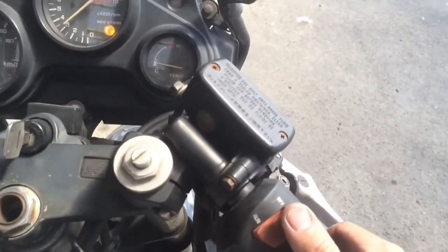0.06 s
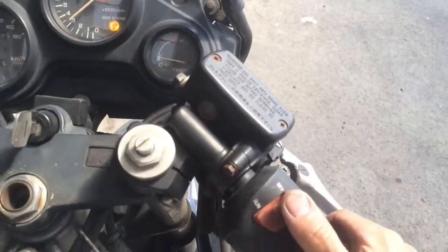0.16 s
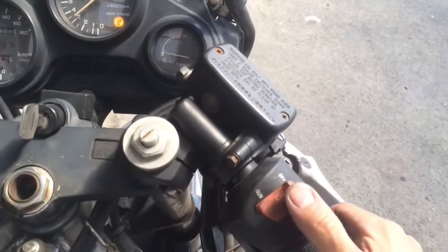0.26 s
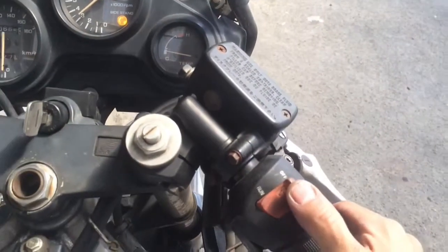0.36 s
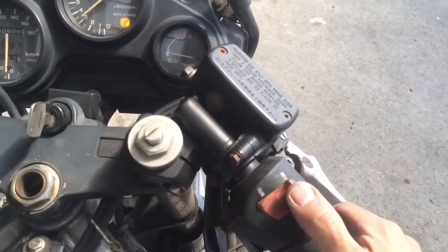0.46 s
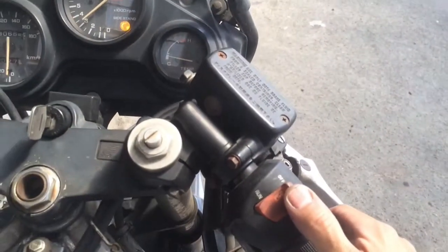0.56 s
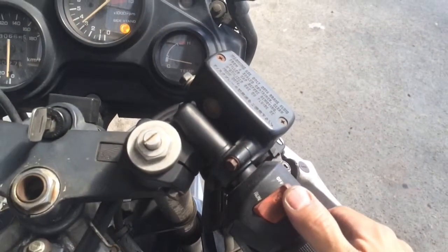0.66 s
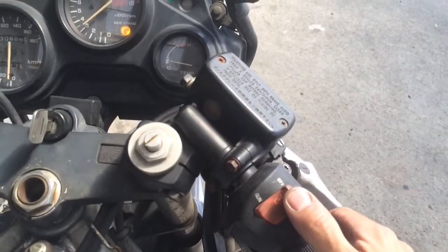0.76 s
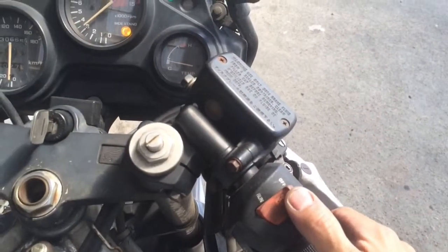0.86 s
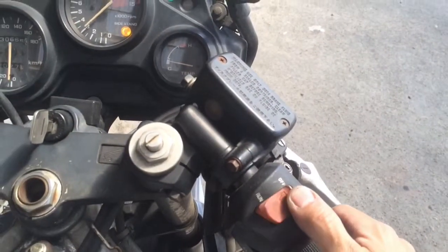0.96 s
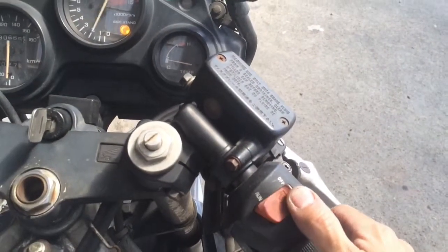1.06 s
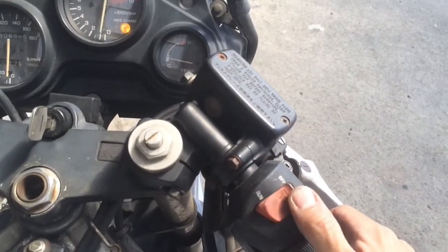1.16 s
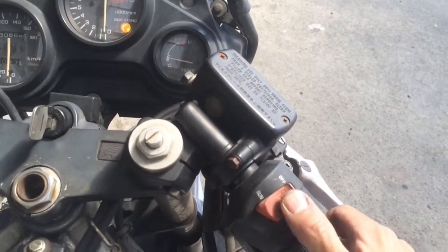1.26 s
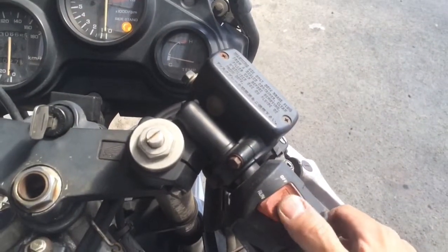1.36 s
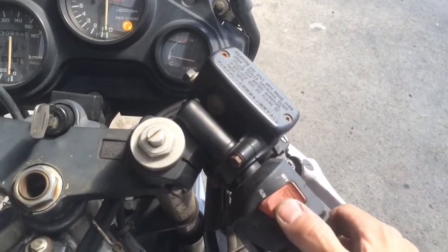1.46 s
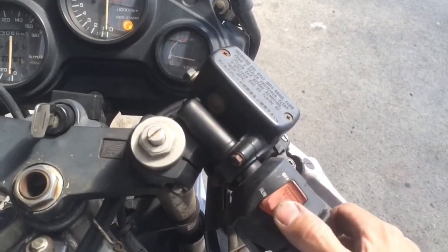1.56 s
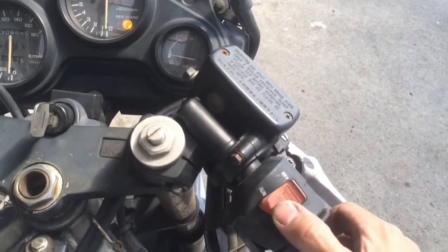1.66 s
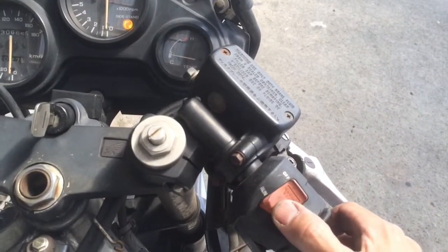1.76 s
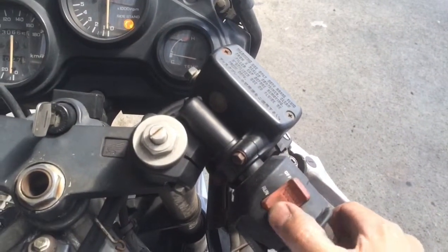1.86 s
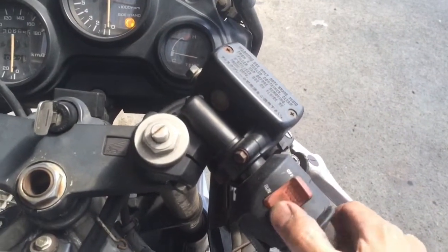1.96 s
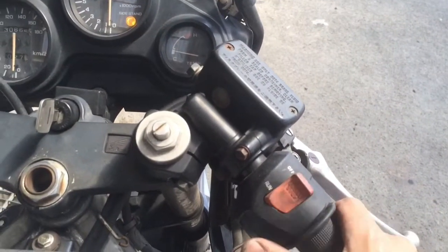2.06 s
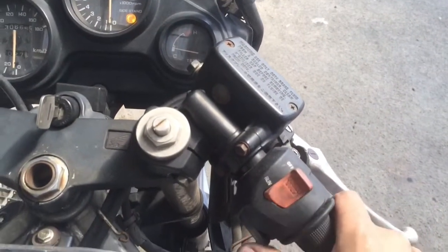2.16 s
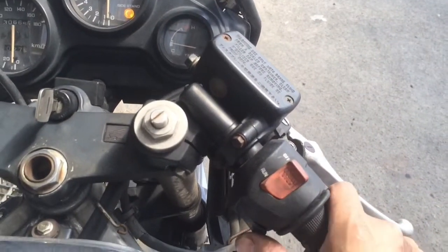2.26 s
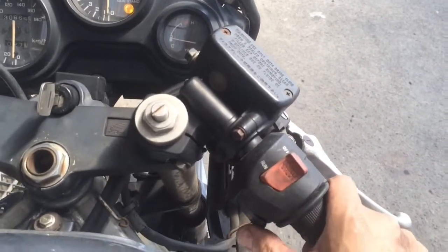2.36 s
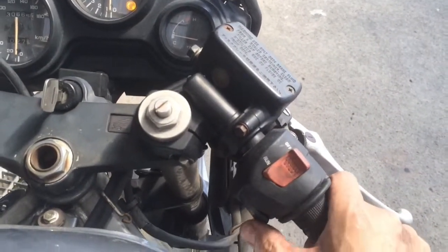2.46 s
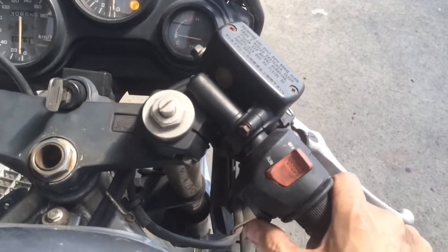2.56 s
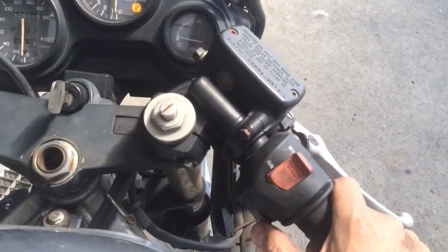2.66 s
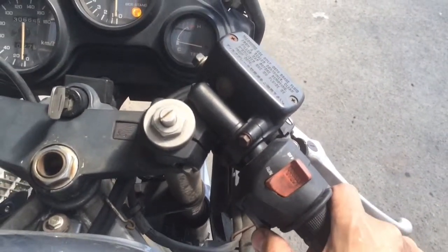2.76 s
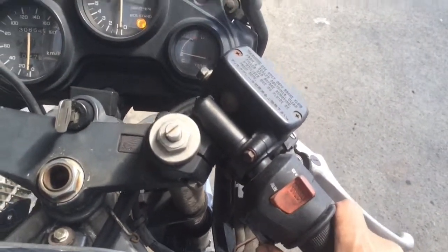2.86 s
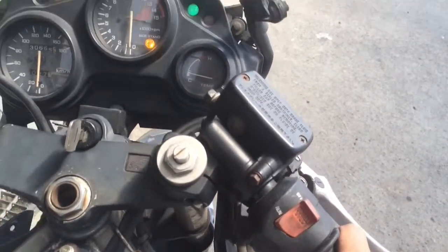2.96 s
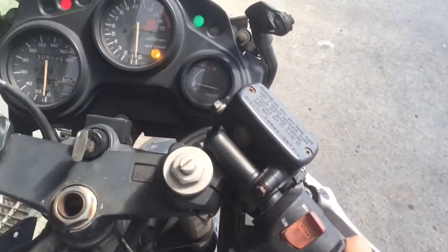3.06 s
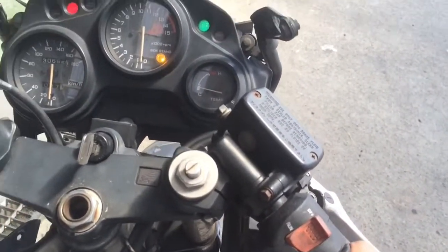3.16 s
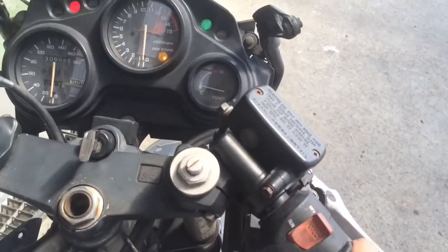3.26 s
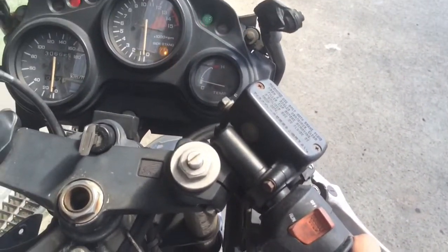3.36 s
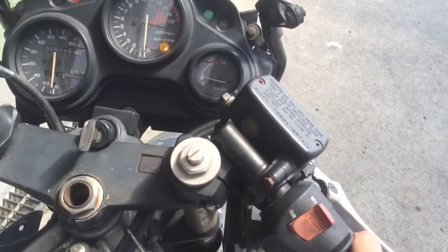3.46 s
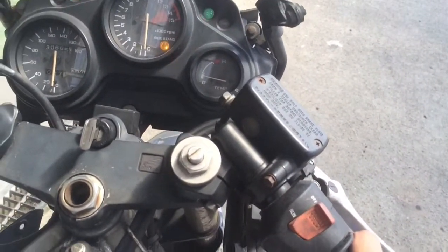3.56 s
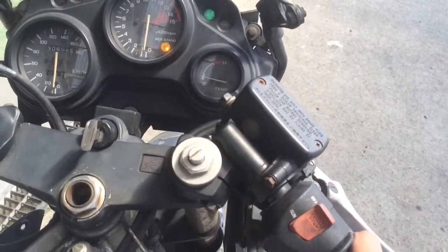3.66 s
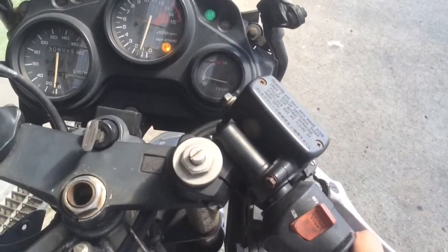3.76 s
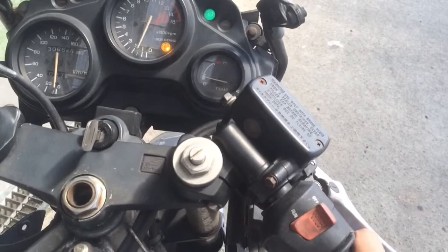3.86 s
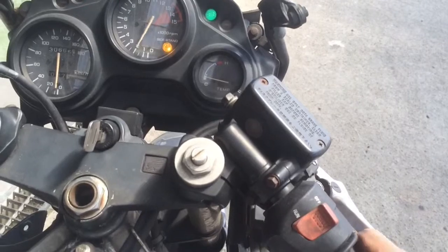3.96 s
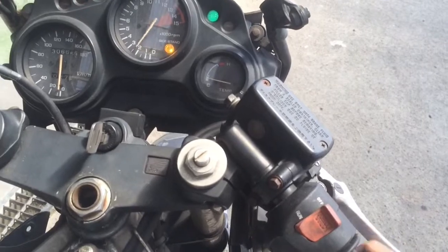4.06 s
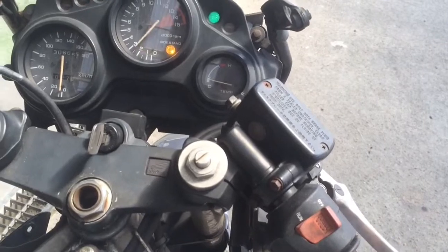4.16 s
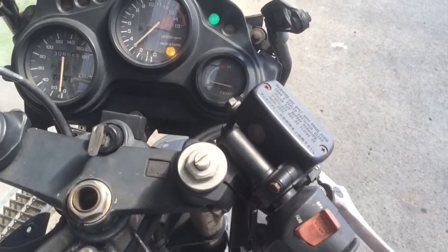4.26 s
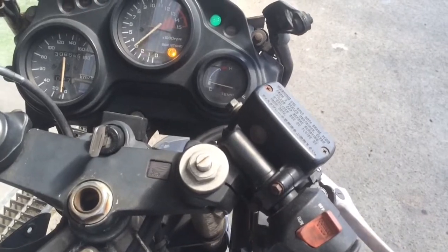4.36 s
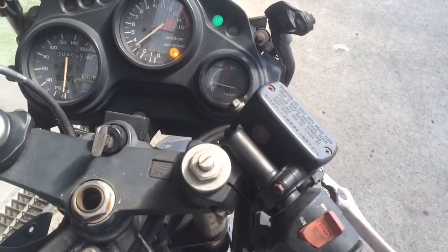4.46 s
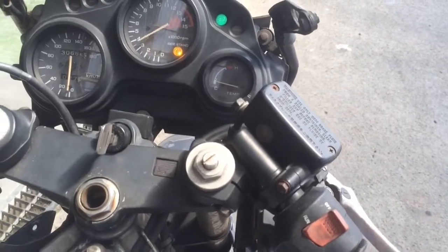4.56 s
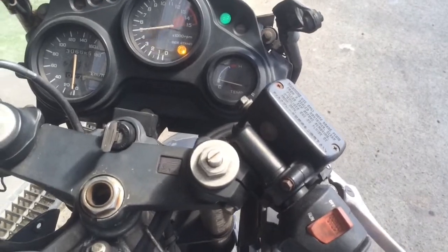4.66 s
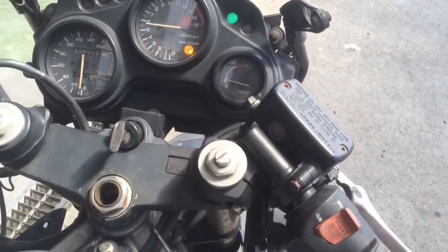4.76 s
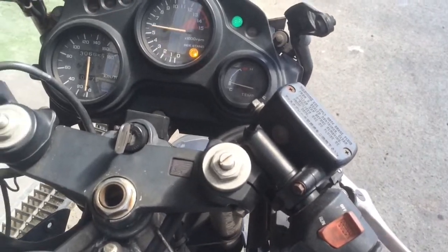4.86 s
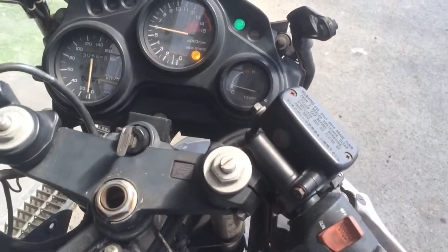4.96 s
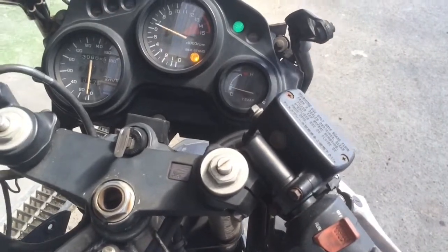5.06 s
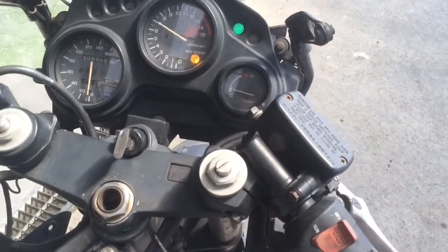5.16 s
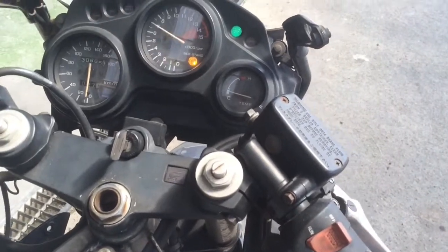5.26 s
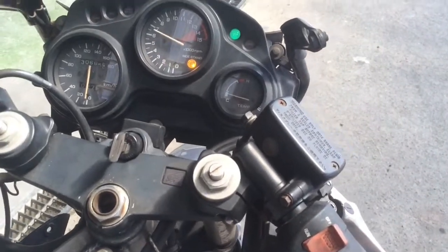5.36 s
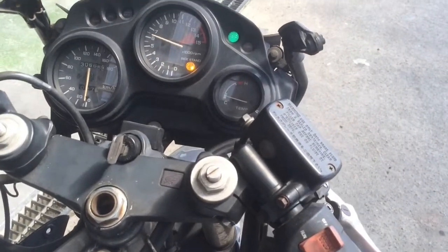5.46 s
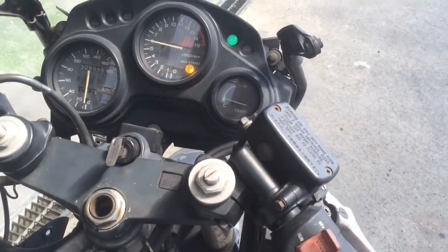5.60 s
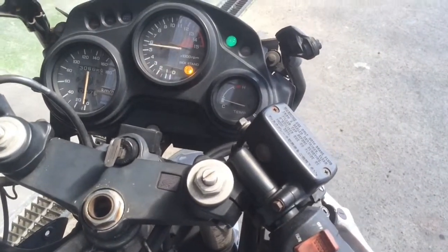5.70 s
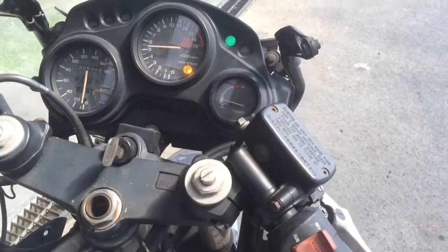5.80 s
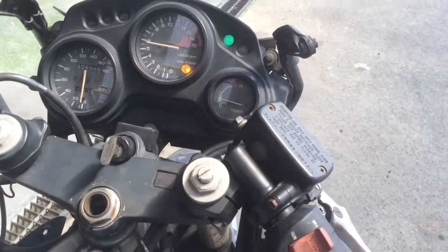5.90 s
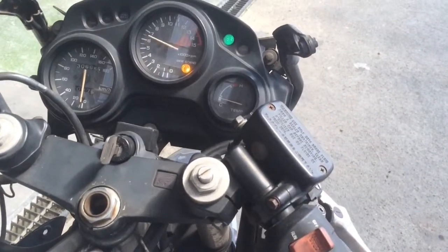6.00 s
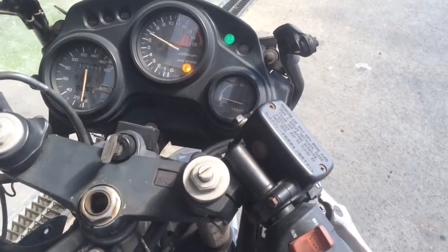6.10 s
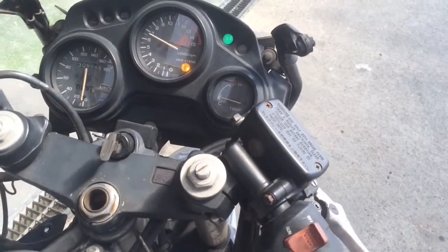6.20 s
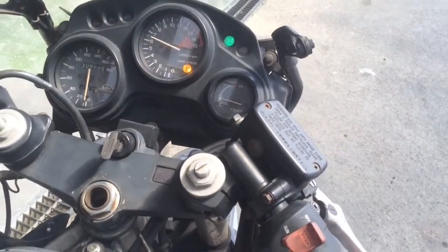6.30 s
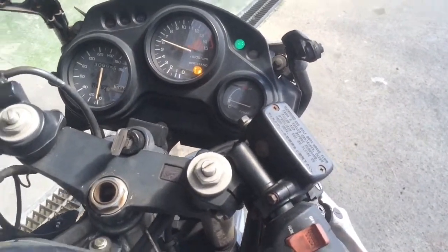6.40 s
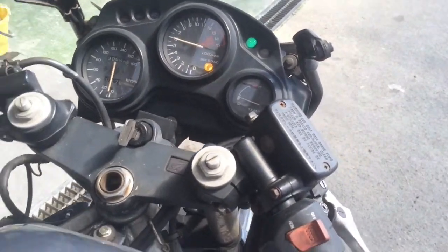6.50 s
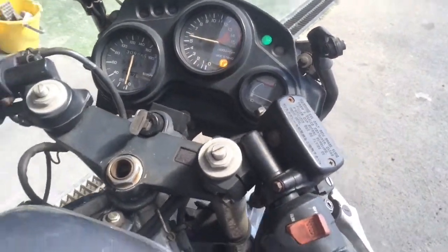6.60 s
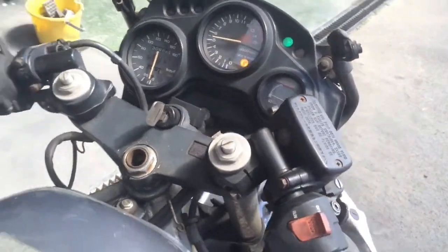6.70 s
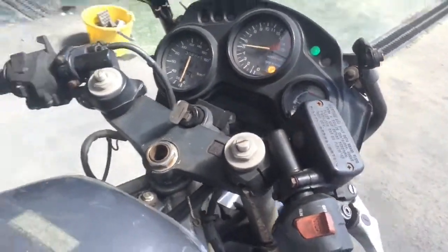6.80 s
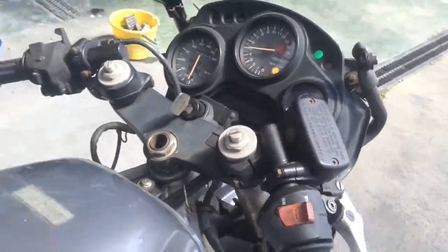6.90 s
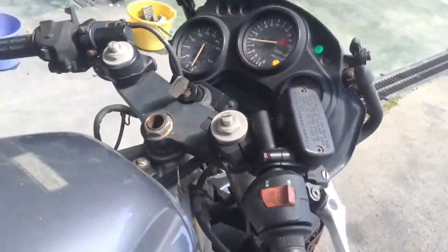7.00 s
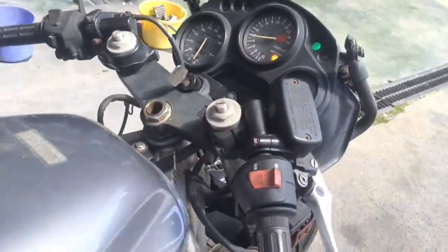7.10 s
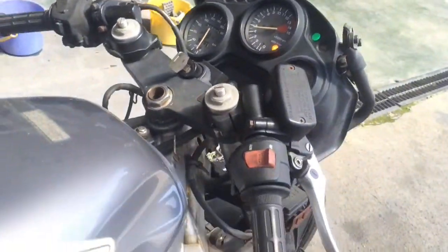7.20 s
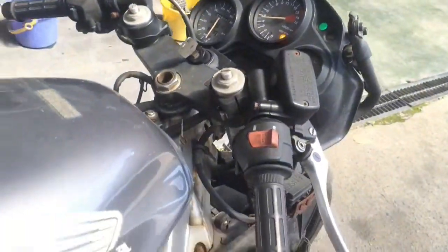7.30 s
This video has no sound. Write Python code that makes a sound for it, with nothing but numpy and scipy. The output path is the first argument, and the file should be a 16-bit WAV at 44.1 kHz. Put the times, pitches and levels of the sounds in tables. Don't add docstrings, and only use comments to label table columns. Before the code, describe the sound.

From 0 to 1.04 s a four-cylinder motorcycle holds an even, fast idle: a low hum near 104 Hz, valve clatter, light intake hiss and faint whine. At 1.04 s a loud, bright plastic snap; the pitch slides down and the engine dies by about 1.6 s with a dull knock and short rattle. Then quiet: a far engine throbs low under soft street noise. At 1.97 s a second sharp snap, followed by tiny glove rustles; a very faint bird twitters at 2.8 s. At 3.38 s a small clunk, and the starter grinds in uneven heaves. At 3.69 s the engine catches roughly, with soft booming thumps, and climbs to idle by 4.4 s. Throttle blips rise sharply at 4.58, 5.0 (highest) and 5.88 s, with roar and raspy intake, each sinking afterwards; the last falls gradually until the end at about 7.3 s, gear whine swelling. Close, dry, mono.

```python
import sys
import numpy as np
from scipy import signal
from scipy.fft import rfft, irfft, next_fast_len
from scipy.io import wavfile
from scipy.ndimage import uniform_filter1d

SR = 44100
rng = np.random.default_rng(int(sys.argv[2]) if len(sys.argv) > 2 else 0)


def natural_amplitude(level_db):
    exponent = np.asarray(level_db, float) / 20
    return 10 ** exponent


def unload_audio(sound):
    columns = np.transpose(np.atleast_2d(sound))
    steps = np.round(np.clip(columns, -1, 1) * 32767)
    wavfile.write(sys.argv[1], SR, steps.astype(np.int16))


N = 323694
SECONDS = np.arange(N) / SR

# start_s, firing_hz
RUN_DOWN = [(0.0, 102.0), (0.1, 103.3), (0.4, 104.4), (1.04, 104.5), (1.098, 97.1), (1.26, 65.1),
            (1.356, 47.1), (1.45, 33.1), (1.6, 19.0)]
# start_s, firing_hz
CATCH_CLIMB = [(3.69, 63.8), (3.87, 58.8), (3.99, 66.0), (4.08, 77.0), (4.19, 92.5), (4.29, 103.3),
               (4.4, 106.8), (4.47, 112.2), (4.575, 116.2)]
# opens_s, shuts_s, top_hz, rest_hz (sinks towards)
BLIPS = [
    (4.578, 4.766, 211.5, 144),
    (5.0, 5.155, 257, 130),
    (5.875, 6.068, 249, 131),
]
BLIP_EFFORT = [5.5, 6.5, 5]
# start_s, effort_db
CATCH_EFFORT = [(3.68, 2), (3.72, 9.5), (3.79, 5), (3.95, 3.5), (4.2, 2)]
# idle_level_db, share of the speed law, share of the effort
CLATTER_LAW = (-39, 0.99, 0.83)
HISS_LAW = (-46.5, 0.98, 0.67)
WEAK_LINE_LAW = (-38.5, 0.27, 1.36)
STRONG_LINE_LAW = (2.84, 0.17, 0.083)
RASP_LAW = (-52.5, 1.46, 1.9)
# multiple of firing rate, level_db, share of the effort, first_idle_db (while it runs even)
STRONG_LINES = [(.25, -13, .6, -3), (.5, -1.4, 0.048, 0), (.75, -13.5, 0.088, -12), (1, 0.24, 0.4, -6),
                (2, -11, 0.52, 0.5), (2.5, -24.5, 0.091, -5), (3, -19, 0.72, -7.5)]
# multiple of firing rate, level_db
WEAK_LINES = [(1.25, -15), (1.5, -7), (1.75, -10), (3.5, -7.5), (4, -3.5), (4.5, -12), (5, -3.5),
              (5.5, -11.5), (6, -4), (7, -9.5), (8, -10), (8.5, -3), (9, -27), (10, -48)]
# centre_hz, width_hz, level_db
SILENCER = [(58, 10, -50.5), (71.6, 15, -34), (84.3, 13.2, -34), (122, 17, -42), (151.3, 11, -34.5),
            (172.6, 11.6, -30), (207.1, 11, -27), (234.3, 35, -24.5), (303, 29, -31.5), (335, 140, -30.5),
            (400, 65, -22), (503, 270, -27.5), (607, 92, -15.5), (707, 110, -19)]
# centre_hz, width_hz, level_db
PIPE = [(75, 28, -6), (190, 30, 2), (228, 45, 0), (400, 45, -2), (520, 40, 0), (620, 60, 2), (730, 60, -1),
        (890, 80, -3), (1090, 120, 0), (1945, 80, 0), (2090, 80, 0)]
# frequency_hz, level_db (per Hz)
BURNING = [(24, -35), (40, -22), (84, -3), (133, -6), (177, 6), (326, 5), (609, 7.5), (784, -3), (1400, 0),
           (2400, -31.5)]
# frequency_hz, level_db (per Hz)
CLATTER = [(410, -9), (700, -0.5), (1210, -7), (1490, -0.5), (1830, -1.5), (2110, 0), (2980, -4.5),
           (5000, -14), (6500, -51), (11000, -120)]
# centre_hz, width_hz, level_db
CASINGS = [(1080, 60, -3), (1240, 50, -6), (1935, 55, -1), (2095, 50, -1), (2290, 60, -6), (2700, 90, -4),
           (3230, 200, -3), (3580, 90, -6)]
# frequency_hz, level_db (per Hz)
HISS = [(2060, -13.5), (3500, -6.5), (5080, -7), (6430, -8), (14700, -30), (15400, -24)]
# centre_hz, width_hz, level_db
AIRBOX = [(1190, 260, 0), (1925, 62, 2), (2077, 59, -2), (3580, 640, -1), (4750, 390, -5.5)]
# start_s, length_s, level_db, fall_db, swell_s
CAM_WHINE = [
    (-.1, 1.16, -54, -2, .02),
    (1.06, .25, -45, 0, .02),
    (3.68, .92, -48, -4, .06),
]
PRIMARY_WHINE = [
    (5.69, .25, -35, 2.5, .08),
    (6.62, .7, -34, 2, .3),
]
# multiple of its rate, level_db
FAR_LINES = [(2, -7), (3, 0), (4, -18), (5, -6), (6, -6), (7, -4), (8, -16), (9, -12), (10, -16), (12, -13),
             (13, -15), (17, -17), (20, -13)]
# frequency_hz, level_db (per Hz)
STREET = [(18, -37), (30, -11), (71, 5), (114, -21), (168, -3.5), (218, -16), (368, -12), (503, -11.5),
          (689, -21.5), (1590, -13.5), (1910, -24), (3570, -25.5), (15400, -52.5)]
# centre_hz, width_hz, level_db
STREET_MODES = [(486, 9, 2.5), (870, 86, 7), (1500, 35, -22), (3270, 290, 5.5)]
# start_s, length_s, level_db, fall_db
TWITTER = (2.8, .27, -76, 2)
# start_s, peak_db
SNAPS = [
    (1.039, -6),
    (1.972, -7),
    (3.376, -33),
]
# pitch_hz, level_db, t60_s
ROCKER = [(1086, -6.5, 0.013), (2360, -9, 0.0028), (4550, -6, 0.0053), (6470, -4.5, 0.004),
          (7370, -11, 0.011), (9050, -2.5, 0.0022), (11100, -8, 0.0055), (14200, -6, 0.0033)]
# start_s, length_s, level_db, fall_db, dullness_hz
RATTLES = [
    (1.607, 0.0095, -32.5, 18, 7800),
    (1.609, 0.18, -40.5, 25, 1570),
    (1.993, 0.013, -55, 6, 14000),
    (2.108, 0.038, -66, 7, 14000),
    (3.36, 0.01, -61, 0, 8950),
    (3.375, 0.023, -38.5, 10, 5000),
    (3.945, 0.037, -32.5, 16, 2500),
    (1.62, 0.17, -60, 11, 14000),
]
# start_s, level_db, pitch_hz, t60_s
KNOCKS = [
    (1.622, -34, 190, .13),
    (1.608, -46, 780, .06),
    (1.61, -48, 510, .08),
    (3.375, -33, 540, .04),
    (3.375, -40, 1950, .03),
    (4.588, -24, 1130, .05),
    (4.588, -25, 600, .06),
]
# start_s, length_s, level_db, fall_db, pitch factor
STROKES = [
    (3.395, .13, -40, 4.5, 0.89),
    (3.522, 0.077, -34, 1, 1.26),
    (3.592, 0.047, -43.5, 1, 0.63),
    (3.634, 0.05, -30, 6, 1),
    (3.681, 0.033, -44, 16, 0.95),
]
# frequency_hz, level_db (per Hz)
STARTER = [(71, -33), (120, -6), (212, -1), (312, -3.5), (648, -4), (843, 7), (1170, -4.5), (2910, -5),
           (4110, -10.5), (11100, -20.5), (15400, -45)]
# centre_hz, width_hz, level_db
HOUSING = [(196, 12, 11), (860, 47, 8), (1330, 61, 3), (2000, 110, 10), (2900, 78, 0)]
# start_s, level_db
THUMPS = [(3.715, -26), (3.745, -22), (3.82, -31), (3.886, -29.5), (3.949, -31), (4.015, -33), (4.191, -33),
          (4.225, -31), (4.289, -29), (4.44, -30), (4.48, -32)]
# pitch_hz, level_db, t60_s
BOOM = [(85, -0.5, 0.25), (130, -5.5, 0.13), (186, -0.5, 0.13)]


def rms_one(x):
    return x / np.sqrt(np.mean(x ** 2) + 1e-20)


def in_time(rows):
    s, *columns = np.transpose(rows)
    return [np.interp(SECONDS, s, c) for c in columns]


def window(start, end, edge):
    return np.clip(np.minimum(SECONDS - start, end - SECONDS) / edge, 0, 1)


def burst(start, length, db, fall_db, edge):
    fall = fall_db * np.clip((SECONDS - start) / length, 0, 1)
    return natural_amplitude(db - fall) * window(start, start + length, edge)


def drift(rate):
    sos = signal.butter(2, rate, fs=SR / 32, output="sos")
    slow = signal.sosfilt(sos, rng.standard_normal(N // 32 + 1502))[1500:]
    return np.interp(np.arange(N) / 32, np.arange(len(slow)), rms_one(slow))


def coloured(x, spectrum, low_hz, high_hz):
    size = next_fast_len(N)
    hz = np.maximum(np.arange(size // 2 + 1) * SR / size, 1)
    points = np.array(spectrum)
    gain_db = np.interp(np.log(hz), np.log(points[:, 0]), points[:, 1])
    shaped = rfft(x, size) * natural_amplitude(gain_db)
    band = shaped[(hz > low_hz) & (hz < high_hz)]
    band_rms = np.sqrt(2 * np.sum(np.abs(band) ** 2)) / size
    return irfft(shaped / band_rms, size)[:N]


def resonate(x, modes):
    out = np.zeros(N)
    for k, (hz, width, db) in enumerate(modes):
        r = np.exp(-np.pi * abs(width) / SR)
        b = (1 - r * r) / 2 * np.array([1, 0, -1])
        a = [1, -2 * r * np.cos(2 * np.pi * hz / SR), r * r]
        out += (-1) ** k * natural_amplitude(db) * signal.lfilter(b, a, x)
    return out


def ring(clicks, hz, t60):
    r, w = natural_amplitude(-60 / (t60 * SR)), 2 * np.pi * hz / SR
    return signal.lfilter([0, np.sin(w)], [1, -2 * r * np.cos(w), r * r], clicks + 1e-18)


def speed():
    sink_s, flywheel_s = 0.5, 0.03
    hz, = in_time(RUN_DOWN + CATCH_CLIMB)
    for opens, shuts, top_hz, rest_hz in BLIPS:
        first = round(opens * SR)
        climb = np.interp(SECONDS, [opens, shuts], [hz[first], top_hz])
        sink = rest_hz + (top_hz - rest_hz) * np.exp(-(SECONDS - shuts) / sink_s)
        hz[first:] = np.minimum(climb, sink)[first:]
    return uniform_filter1d(hz, size=round(flywheel_s * SR))


def effort():
    lag_s, rise_s, hold_s, fall_s = 0.008, 0.043, 0.038, 0.15
    total_db = 0
    for (opens, shuts, _, _), db in zip(BLIPS, BLIP_EFFORT):
        corners = [opens, opens + rise_s, shuts + hold_s, shuts + hold_s + fall_s]
        total_db = total_db + db * np.interp(SECONDS - lag_s, corners, [0, 1, 1, 0])
    return total_db


def silencer_db(hz):
    grid = np.arange(1000.)
    power = sum(natural_amplitude(2 * db) / (1 + (2 * (grid - top_hz) / width) ** 2) ** 2 for top_hz, width, db in SILENCER)
    return np.interp(hz, grid, 10 * np.log10(power))


def exhaust(firings, strong_db, weak_db, waver_db):
    strong, weak = 0, 0
    for (k, *_), db in zip(STRONG_LINES, strong_db):
        strong = strong + natural_amplitude(db + waver_db * np.sqrt(k) * drift(12)) * np.cos(2 * np.pi * k * firings)
    for k, db in WEAK_LINES:
        weak = weak + natural_amplitude(db + 0.62 * drift(6.5)) * np.cos(2 * np.pi * (k * firings + rng.random()))
    weak = weak * (1 + 0.7 * np.cos(np.pi * firings / 2))
    return strong + natural_amplitude(weak_db) * (resonate(weak, PIPE) + natural_amplitude(-25.0) * weak)


def gear_whine(firings):
    out = np.zeros(N)
    for teeth, spells in ((21.4, CAM_WHINE), (16.9, PRIMARY_WHINE)):
        wobble = 0.15 * drift(40)
        level = sum(burst(*spell) for spell in spells)
        out += level * natural_amplitude(3 * drift(14)) * np.cos(2 * np.pi * (teeth * firings + wobble))
    return out


def gated(firings, depth):
    swell = 1 + depth * np.cos(2 * np.pi * firings + 0.78 * drift(38))
    return rng.standard_normal(N) * swell * natural_amplitude(0.82 * drift(23))


def valve_clatter(firings):
    ticks = gated(firings, depth=0.3)
    ringing = resonate(np.roll(ticks, N // 2), CASINGS)
    return coloured(ticks + natural_amplitude(4) * ringing, CLATTER, low_hz=1200, high_hz=4000)


def intake_hiss(firings):
    return coloured(gated(firings, depth=0.043), HISS, low_hz=5000, high_hz=14000)


def burning(firings, pulse_share):
    fired = np.diff(np.floor(firings), prepend=0) > 0
    pulses = rms_one(fired * rng.standard_normal(N))
    pulses = signal.lfilter(*signal.butter(2, 330, fs=SR), pulses)
    source = pulse_share * pulses + rng.standard_normal(N)
    return coloured(source + natural_amplitude(3) * resonate(source, PIPE[:9]), BURNING, low_hz=150, high_hz=900)


def airbox_rasp(firings):
    gulps = gated(firings, depth=0.9) * natural_amplitude(3 * drift(60))
    return rms_one(resonate(gulps, AIRBOX))


def engine():
    idle_hz, knee_hz, cut_s = 104, 140, 1.07
    firing_hz = speed()
    speed_db = 11.5 * np.log2(np.minimum(firing_hz, knee_hz) / idle_hz)
    speed_db = speed_db + 4 * np.log2(np.maximum(firing_hz / knee_hz, 1))
    effort_db = effort()
    catch_db, = in_time(CATCH_EFFORT)
    opening = np.clip(uniform_filter1d(np.gradient(firing_hz) * SR, size=2000) / 500, 0, 1)
    slowness = np.clip(np.log2(108 / firing_hz), 0, 1.5)
    unfired_db = -4.5 * window(cut_s, 1.32, 0.12)
    even = window(-1, cut_s, 0.022)

    def law_db(law):
        idle_db, speed_share, effort_share = law
        return idle_db + speed_share * speed_db + effort_share * effort_db

    clatter_db = law_db(CLATTER_LAW) + catch_db
    hiss_db = law_db(HISS_LAW) + 0.54 * catch_db
    line_db = law_db(STRONG_LINE_LAW) + 0.071 * catch_db
    weak_db = law_db(WEAK_LINE_LAW) + unfired_db - 1.4 * catch_db + 5 * opening
    burn_db = clatter_db - 10.0 + 11.3 * slowness + 6.1 * opening + unfired_db + 0.36 * catch_db
    strong_db = []
    for k, db, effort_share, even_db in STRONG_LINES:
        lift_db = 2.5 * max(k - 1, 0) * opening
        source_db = line_db + db + effort_share * effort_db + lift_db + even_db * even
        strong_db.append(source_db + silencer_db(k * firing_hz))
    waver_db = 0.7 + 0.25 * np.minimum(np.abs(speed_db), 5)

    firings = np.cumsum(firing_hz * (1 + 0.002 * drift(12))) / SR
    tones = exhaust(firings, strong_db, weak_db, waver_db) + gear_whine(firings)
    noise = natural_amplitude(clatter_db - 1.5) * valve_clatter(firings)
    noise += natural_amplitude(hiss_db) * intake_hiss(firings)
    noise += natural_amplitude(burn_db) * burning(firings, pulse_share=0.7 + 2.2 * np.minimum(slowness, 0.8))
    noise += natural_amplitude(law_db(RASP_LAW)) * airbox_rasp(firings)
    turning = window(-1, 1.7, 0.09) + window(3.685, 9, 0.015)
    coasting = window(-1, 1.67, 0.1) + window(3.67, 9, 0.051)
    return turning * tones + coasting * noise


def street():
    far_hz, far_db, street_db = 25.35, -56, -57
    turns = np.cumsum(far_hz * (1 + 0.004 * drift(1.5))) / SR
    lines = np.zeros(N)
    for k, db in FAR_LINES:
        lines += natural_amplitude(db + 0.5 * drift(6.7)) * np.cos(2 * np.pi * (k * turns + rng.random()))
    noise = rng.standard_normal(N) * (1 + 0.047 * np.cos(2 * np.pi * turns))
    bed = coloured(noise + resonate(noise, STREET_MODES), STREET, low_hz=250, high_hz=15400)
    bed = signal.lfilter(*signal.butter(1, 130, "high", fs=SR), bed)
    twitter = rms_one(resonate(noise * natural_amplitude(4.2 * drift(23)), [(5900, 500, 0)]))
    return natural_amplitude(far_db) * lines + natural_amplitude(street_db) * bed + twitter * burst(*TWITTER, edge=0.05)


def switches():
    bounce_samples = np.array([0, 14, 33, 70])
    bounce_db = np.array([-9.0, 2.5, -38, 4.5])
    out = np.zeros(N)
    for hz, mode_db, t60 in ROCKER:
        clicks = np.zeros(N)
        for s, peak_db in SNAPS:
            height = natural_amplitude(peak_db + mode_db - 15.0 + bounce_db)
            clicks[round(s * SR) + bounce_samples] = height * rng.choice([-1, 1], 4)
        out += ring(clicks, hz, t60)
    return out


def rattles():
    out = np.zeros(N)
    grains = rng.standard_normal(N) * natural_amplitude(1.33 * drift(240))
    for s, length, db, fall_db, dull_hz in RATTLES:
        dulled = signal.lfilter(*signal.butter(2, [150, dull_hz], "band", fs=SR), grains)
        out += rms_one(dulled) * burst(s, length, db, fall_db, edge=0.00073)
    return out


def knocks():
    out = np.zeros(N)
    for s, db, hz, t60 in KNOCKS:
        blow = natural_amplitude(db) * (np.arange(N) == round(s * SR))
        out += ring(blow, hz, t60)
    return out


def starter():
    teeth = rng.standard_normal(N) * natural_amplitude(2.2 * drift(200))
    grind = np.zeros(N)
    for s, length, db, fall_db, pitch in STROKES:
        modes = [(hz * pitch if hz > 300 else hz, width, top_db) for hz, width, top_db in HOUSING]
        grind += (teeth + resonate(teeth, modes)) * burst(s, length, db, fall_db, edge=0.005)
    scale = np.std(coloured(teeth, STARTER, low_hz=120, high_hz=15000)) * np.std(grind)
    return scale * coloured(grind, STARTER, low_hz=120, high_hz=15000)


def thumps():
    s, db = np.transpose(THUMPS)
    blows = np.zeros(N)
    blows[(s * SR).astype(int)] = natural_amplitude(db - 2.0)
    blows = signal.lfilter(*signal.butter(2, 230, fs=SR), blows)
    return sum(natural_amplitude(mode_db) * ring(blows, hz, t60) for hz, mode_db, t60 in BOOM)


def scene():
    mono = engine() + street() + switches() + rattles() + knocks() + starter() + thumps()
    return np.array([mono, mono])


def band_limit(x):
    return signal.sosfilt(signal.butter(12, 16510, fs=SR, output="sos"), x)


def record(dry):
    thin = signal.sosfilt(signal.butter(3, 42, "high", fs=SR, output="sos"), dry)
    thin = signal.sosfilt(signal.cheby2(10, 60, 16600, fs=SR, output="sos"), thin)
    return band_limit(thin)


dry = scene()
out = record(dry)
unload_audio(out)
```